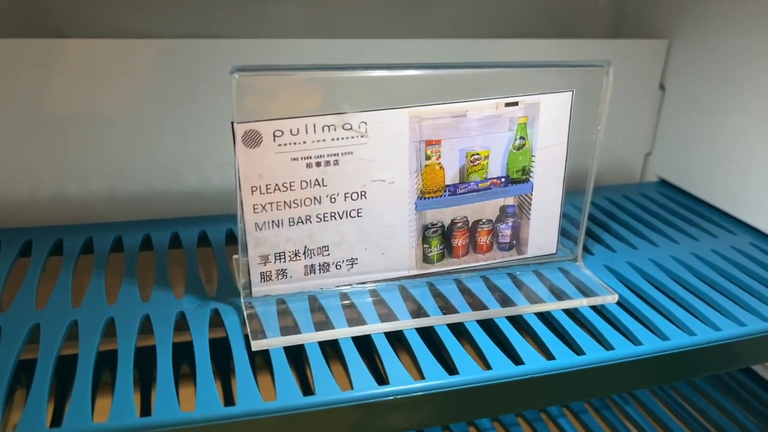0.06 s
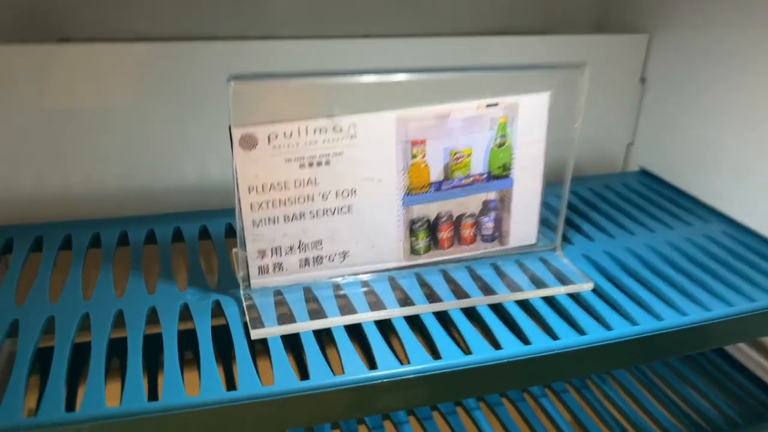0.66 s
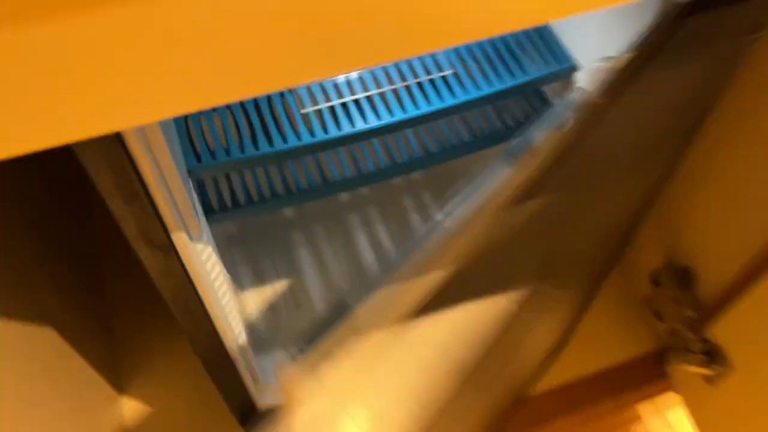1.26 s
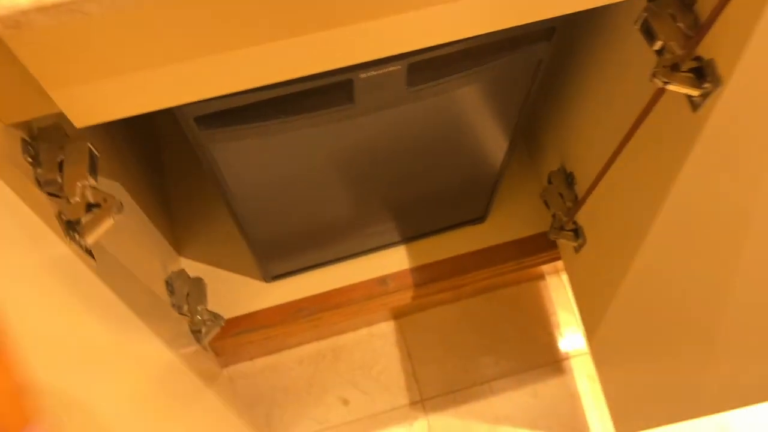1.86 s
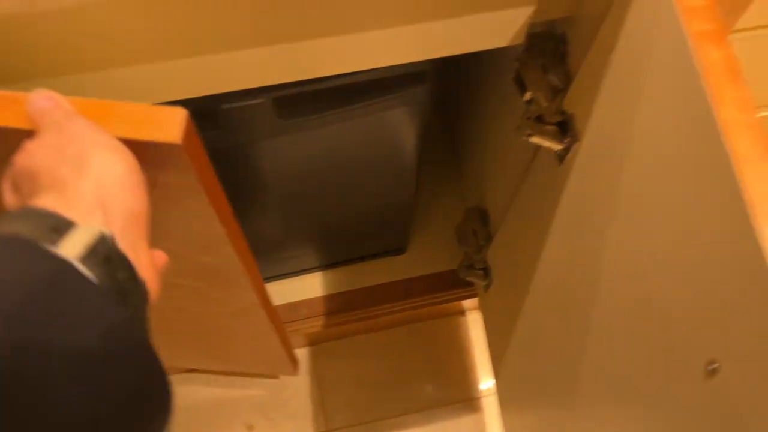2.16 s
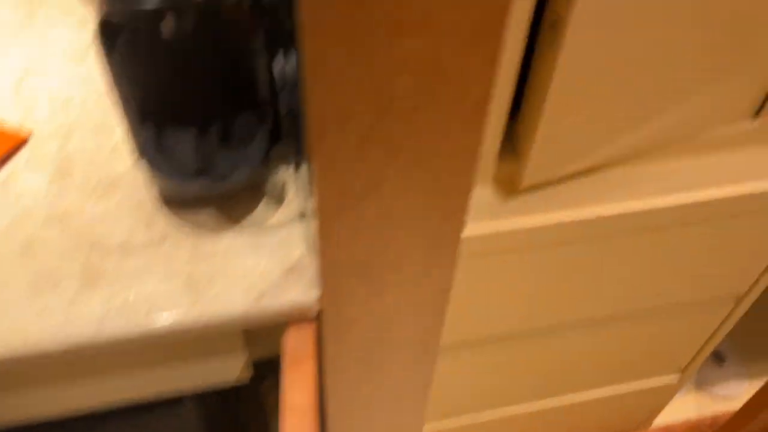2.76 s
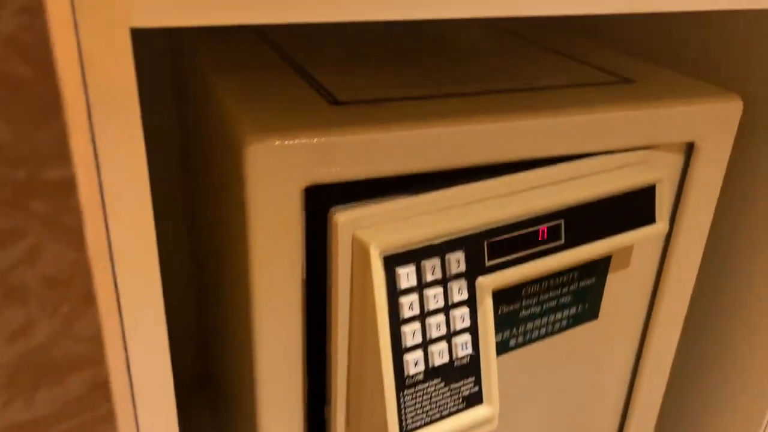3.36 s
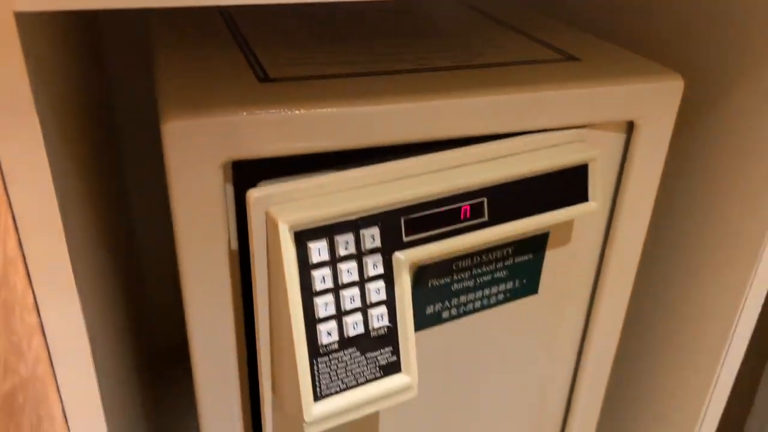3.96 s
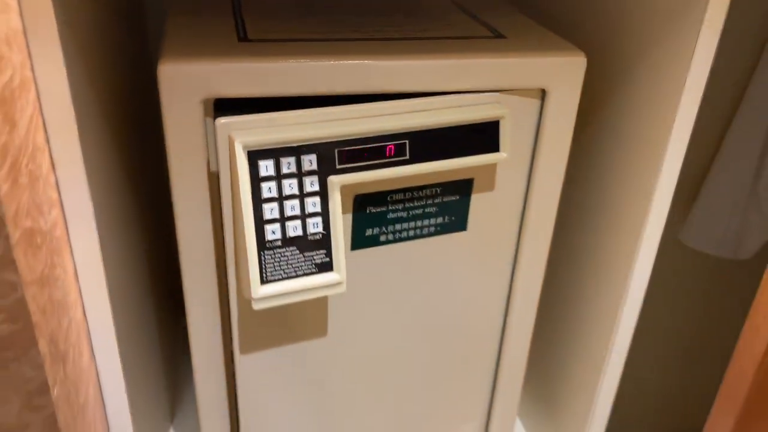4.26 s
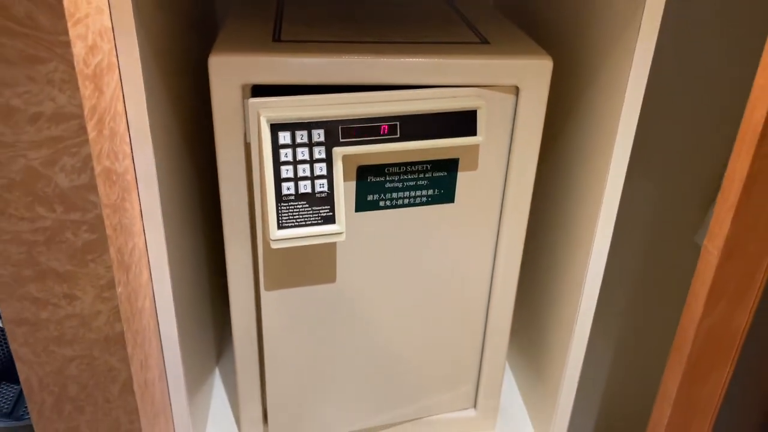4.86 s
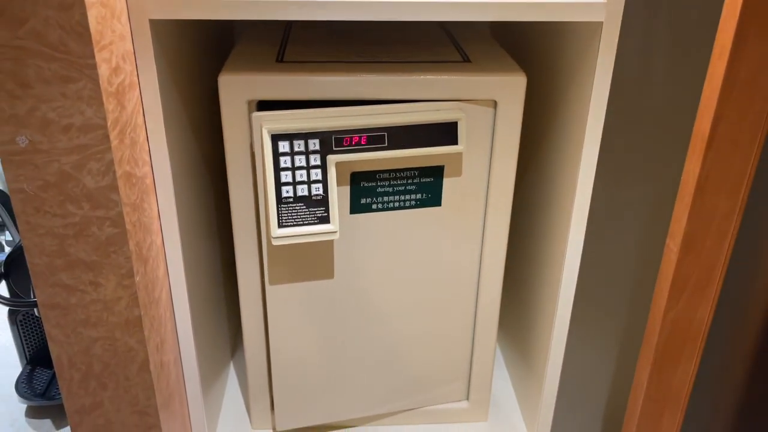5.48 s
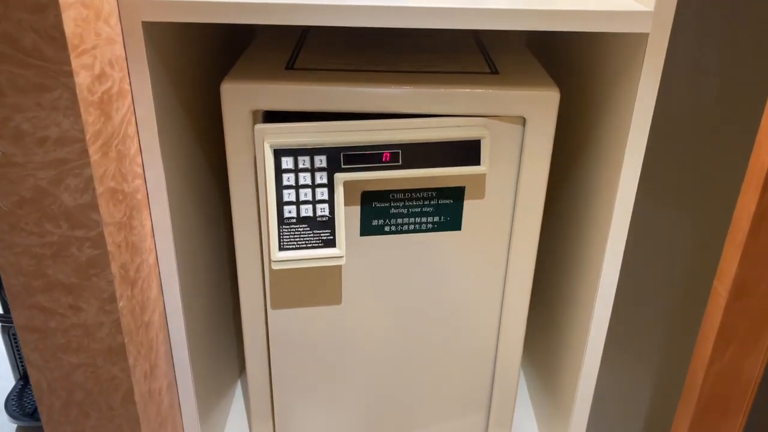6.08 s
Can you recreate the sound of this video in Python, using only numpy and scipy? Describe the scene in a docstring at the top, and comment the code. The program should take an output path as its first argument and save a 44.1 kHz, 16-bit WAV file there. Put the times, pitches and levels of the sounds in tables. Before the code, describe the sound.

Soft hollow bumps and a click come from a small fridge, then its door shuts with a rubbery slap and a low boom. A few light hinge ticks and faint sleeve rustles follow. Then a wooden cabinet door bangs closed, bouncing quickly a few times, with one last click after it. The microphone is close, in a quiet room with a low rush of ventilation.

```python
"""A small fridge is pushed shut, then a wooden cabinet door swings closed, close by in a quiet room.
The fridge's rubber seal slaps against its frame and the whole box booms.
The wooden door bangs and bounces a few times, each blow weaker, and its panel rings.
Around them are soft bumps, hinge ticks, brief rubs, a rustling sleeve and the low rush of ventilation."""
import sys
import numpy as np
from scipy import signal
from scipy.fft import rfft, irfft
from scipy.io import wavfile
from scipy.ndimage import uniform_filter1d

SR = 44100
rng = np.random.default_rng(int(sys.argv[2]) if len(sys.argv) > 2 else 0)


def store_wav(level_fs):
    """Save 16-bit WAV to argv[1]."""
    pcm = np.round(np.clip(np.atleast_2d(level_fs), -1, 1) * 32767)
    wavfile.write(sys.argv[1], SR, pcm.T.astype(np.int16))


N = 274419

# Levels are relative. A "colour" says how strong a noise is at each pitch.
# fade_s is the time to die away by 60 dB. A higher tilt (dB per octave) sounds brighter.
# how alike the left and right sides sound: pitch_hz, likeness (1 = the same)
STEREO_LIKENESS = [(60, 1), (200, 0.84), (450, 0.71), (1000, 0.04), (2000, 0.49), (5000, -0.08),
                   (12000, 0.56)]
# how much louder the left side is: pitch_hz, left_minus_right_db
STEREO_BALANCE = [(60, -1.6), (130, -3), (250, -3.5), (500, -3), (1000, -3), (2000, 0), (4500, 2),
                  (10000, -1)]
# rushing air: pitch_hz, level_db
VENT_COLOUR = [(18, -32.5), (30, -10.5), (58, 0.5), (100, -3.5), (145, -14.5), (190, -9), (300, -11),
               (420, -16), (660, -25), (950, -24.5), (1200, -29.5), (1730, -34.5), (1950, -42.5),
               (2600, -47.5), (4500, -52.5), (8000, -61), (15000, -74.5)]
# the rustle as the arm moves: time_s, level_db
SLEEVE_LEVELS = [(0.0, -78.5), (0.19, -114), (0.5, -85), (0.65, -80), (1.1, -73.5), (1.52, -71),
                 (1.69, -78.5), (1.98, -71.5), (2.11, -72.5), (2.83, -79), (3.21, -81), (3.38, -83.5),
                 (3.66, -83), (3.95, -79), (4.21, -67), (4.35, -91), (4.75, -95), (6.2, -90.5)]
# sliding cloth: pitch_hz, level_db
CLOTH_COLOUR = [(300, 7.5), (900, 7.5), (1800, 0.5), (3000, -2.5), (5000, -2), (7000, -9), (10500, -10),
                (12700, -23.5), (15500, -19.5)]
# scuffs and swishes: start_s, length_s, level_db, pitch_hz, width_octaves
RUB_EVENTS = [(0, 0.13, -52, 710, 0.42), (0.12, 0.033, -59, 3740, 0.42), (1.365, .03, -50.5, 630, 0.27),
              (2.099, 0.041, -59, 1500, 0.99), (2.415, .07, -63.5, 4500, 1), (2.616, 0.077, -63, 1640, 0.4),
              (6.08, 0.088, -61, 1180, 0.57)]
# soft bumps inside the fridge: start_s, level_db
BUMP_EVENTS = [(0.147, -41), (0.308, -43.5), (.604, -44.5), (.621, -37), (.80, -47)]
# the hollow space they ring: pitch_hz, level_db, fade_s
HOLLOW_TONES = [(67, -2, 0.55), (100, 2, 0.6), (116.4, 3.5, 0.36), (159.05, 1.5, 0.74), (234, -5.5, 0.28),
                (278, -8.5, 0.21)]
# hinges, catches and light touches: start_s, level_db, tilt_db_per_octave, pitch_hz
TICK_EVENTS = [(.598, -32.5, -3.5, 1693), (1.132, -34, 4.5, 1810), (1.35, -30, -1, 1050),
               (1.818, -33, -4, 1630), (2.305, -34, -6, 1425), (3.267, -31, -2.5, 1728),
               (3.792, -28, 0, 2307), (4.5404, -28.5, -2, 2660), (4.555, -39, 4, 1660)]
# the click of one tick: pitch_hz, level_db
TICK_COLOUR = [(150, 1), (400, 0.5), (900, 1), (1800, -3.5), (2800, -4.5), (4500, -10.5), (7000, -20),
               (10000, -22), (15500, -29)]
# a small metal part: pitch_multiple, level_db, fade_s
METAL_TONES = [(1, -14.5, 0.13), (1.36, -26, 0.08), (1.78, -21, 0.069)]
# the seal's slap: pitch_hz, level_db
SEAL_COLOUR = [(40, -12), (200, 6), (350, 0), (650, 4), (1000, -6.5), (1900, -10.5), (3000, -18.5),
               (4500, -18), (6500, -24), (10000, -17), (12500, -28.5), (15500, -24.5)]
# how late each pitch comes as the air gap closes: pitch_hz, delay_s
SEAL_DELAYS = [(200, 0.0057), (700, 0.0071), (2000, 0.0032), (5000, .0002)]
# the fridge door bouncing on trapped air and rubber: pitch_hz, level_db, fade_s
CUSHION_TONES = [(97, -6, 0.061), (188.8, -9.5, .04)]
# the fridge box, its shelves and the cupboard round it: pitch_hz, level_db, fade_s
FRIDGE_TONES = [(56.92, -7, 0.74), (53.55, -29.5, 2.1), (98, -16.5, 0.27), (128, -23, 0.55),
                (160.2, -21.5, 0.5), (184, -19.5, 0.18), (250.3, -25, 0.46), (296, -25, 0.35),
                (359, -29, .17), (534, -25.5, .15), (580, -28.5, .3), (662, -29.5, 0.25),
                (957, -23.5, 0.21), (1170, -32.5, .22), (1510, -34.5, 0.37), (1870, -32, .11),
                (2210, -33, .12)]
# the fridge's boom in the room: pitch_hz, level_db
BOOM_COLOUR = [(20, -21), (45, -1.5), (100, -3), (190, 2), (300, -2.5), (420, -6.5), (560, -6.5),
               (820, -11.5), (1500, -16), (2500, -19), (3600, -22.5), (4700, -24.5), (6300, -31.5),
               (10000, -30), (12500, -47.5), (15500, -37.5)]
# how long that boom lasts: pitch_hz, fade_s
BOOM_FADES = [(60, 1), (250, .5), (800, 0.52), (2000, .36), (5000, 0.37), (12000, 0.36)]
# the slap coming back from the walls: pitch_hz, level_db
ECHO_COLOUR = [(60, -15), (200, -18), (600, 10.5), (1000, -8), (2300, -6), (4500, -13), (9000, -24),
               (15000, -36)]
# wood hitting wood: pitch_hz, level_db
CLACK_COLOUR = [(100, -11), (250, -9.5), (450, 4.5), (700, -4), (1000, 8), (1300, 5.5), (1650, 7.5),
                (1850, -6), (2400, 1.5), (3200, -13), (4200, -12.5), (5500, -38.5), (8000, -26.5),
                (11000, -39.5), (15500, -44)]
# the wooden panel and its cabinet: pitch_hz, level_db, fade_s
PANEL_TONES = [(63.7, -37, 1), (81.3, -29.5, 0.49), (98.6, -25.5, 0.53), (177.8, -29.5, .5),
               (212.2, -25.5, 0.63), (266, -27.5, .5), (339.5, -15.5, .4), (361.6, -21, 0.3),
               (407, -29.5, 0.3), (481, -29.5, 0.52), (504, -20.5, 0.36), (550, -24.5, 0.43),
               (731, -36, 0.31), (815, -32.5, .45), (904, -30.5, .42), (946, -26.5, 0.55),
               (1000, -19.5, 0.26), (1264, -28.5, 0.38), (1269, -30, 0.22), (1387, -31.5, 0.32),
               (1437, -30.5, 0.24), (1662, -25.5, 0.29), (1860, -34.5, 0.16), (2210, -38, 0.42),
               (2406, -35, 0.28), (2528, -43, .38)]
# the wooden door's sound in the room: pitch_hz, level_db
DOOR_ROOM_COLOUR = [(20, -24), (45, -2.5), (90, -3), (140, -8.5), (210, -1.5), (350, 5), (420, -3.5),
                    (680, -3), (1000, -3.5), (1600, -5), (1850, -10.5), (2500, -13), (3100, -21),
                    (4200, -25), (6000, -36), (9000, -38), (12500, -53), (15500, -50.5)]
# how long the room holds a tick or a clack: pitch_hz, fade_s
ROOM_FADES = [(60, 0.9), (200, .6), (500, 0.36), (1500, 0.39), (4000, 0.45), (8000, 0.39), (14000, .35)]
# the hollow cabinet's thud: pitch_hz, level_db, fade_s
THUD_TONES = [(201.5, -16.5, 0.27), (208.4, -11, 0.25)]
# how fast the short sounds die: pitch_hz, fade_s
TICK_FADES = [(300, .14), (8000, .11)]
SEAL_FADES = [(200, .092), (1000, .06), (8000, .055)]
ECHO_FADES = [(200, .22), (8000, .062)]
CLACK_FADES = [(300, .09), (1500, .055), (8000, .062)]
# the wooden door's bass comes last: pitch_hz, delay_s
DOOR_DELAYS = [(150, .012), (400, .0093), (1000, .002), (4000, .0003)]

FRIDGE_SHUT_S, DOOR_HIT_S, DOOR_HOME_S = 1.4903, 4.1165, 4.213
SPRING_LEAD_S = .037  # the hinge spring snaps this long before the wooden door hits


def amp(db):
    """Turns decibels into a number to multiply a sound by."""
    return 10 ** (np.asarray(db) / 20)


def look_up(table, hz):
    """A table's value at any pitch, sliding smoothly between its rows."""
    pitches, values = np.transpose(table)
    return np.interp(np.log(hz + 1), np.log(pitches + 1), values)


def unit_power(sound):
    """Scales a sound so its average power is 1."""
    return sound / np.sqrt(np.mean(sound ** 2) + 1e-20)


def add(mix, start_s, sound):
    """Lays a stereo sound into the mix."""
    part = mix[:, max(round(start_s * SR), 0):][:, :sound.shape[1]]
    part += sound[:, :part.shape[1]]


def side_gains(hz):
    """How strong a pitch is on the left and on the right."""
    return amp(np.array([[.5], [-.5]]) * look_up(STEREO_BALANCE, hz))


def stereo_noise(size, right_delay_ms=0):
    """Pitches and spectrum of a noise whose two sides match in the bass and part in the treble."""
    hz = np.fft.rfftfreq(size, 1 / SR)
    left, other = rfft(rng.standard_normal((2, size)))
    likeness = np.clip(look_up(STEREO_LIKENESS, hz), -1, 1)
    right = likeness * left + np.sqrt(1 - likeness ** 2) * other
    delay = np.exp(-2j * np.pi * hz * right_delay_ms / 1000)
    return hz, np.array([left, right * delay]) * side_gains(hz)


def resonances(depth_db, count=260):
    """Random peaks and dips from an object's many small resonances. Rows: pitch_hz, level_db."""
    hz = np.linspace(20, 130, count) ** 2
    db = depth_db * np.clip(rng.standard_normal(count), -2, 2) * np.minimum(hz / 1500, 1)
    return np.c_[hz, db - np.log(10) / 20 * np.mean(db ** 2)]  # keeps the power about the same


def burst(colour, body, fades, rise_s, tilt=0, delays=((1, 0),), right_delay_ms=0, size=32768):
    """The noise of a hit: each band of pitches starts, swells and dies away on its own timing."""
    hz, noise = stereo_noise(size, right_delay_ms)
    octaves = np.clip(np.log2((hz + 1) / 1000), -3, 3)
    spectrum = noise * amp(look_up(colour, hz) + look_up(body, hz) + tilt * octaves)
    centres = np.geomspace(40, 16000, 16)
    out = np.zeros((2, size))
    for centre, share in zip(centres, np.eye(len(centres))):
        age = np.maximum(np.arange(size) / SR - look_up(delays, centre), 0)
        band = irfft(spectrum * look_up(np.c_[centres, share], hz), size)
        swell = 1 - np.exp(-(age / rise_s) ** 2)
        out += band * swell * np.exp(-np.log(1000) * age / look_up(fades, centre))
    return out


def ring(tones, rise_s, right_delay_ms=0, blows=((0, 0, 0),)):
    """The fading tones of a struck object; each blow tops up their swing."""
    hz, db, fade_s = np.transpose(tones)[:, :, None]
    t = np.arange(3 * SR // 2) / SR
    swing = 0
    for start_s, blow_db, tilt in blows:
        age = np.maximum(t - start_s, 0)
        force = amp(blow_db + tilt * np.log2(hz / 1000))
        swing = swing + force * (1 - np.exp(-age / rise_s)) * np.exp(-np.log(1000) * age / fade_s)
    waves = amp(db) * swing * np.exp(2j * np.pi * hz * t)
    delay = np.exp(-2j * np.pi * np.outer([0, right_delay_ms / 1000], hz))
    return ((side_gains(hz[:, 0]) * delay) @ waves).imag


def swish(length_s, db, pitch_hz, width_octaves):
    """A band of noise, like rubbing or moving air, that swells, holds and quickly fades."""
    t = np.arange(SR // 2) / SR
    hz, noise = stereo_noise(len(t))
    band = np.exp(-.5 * (np.log2((hz + 1) / pitch_hz) / width_octaves) ** 2)
    colour = band * amp(look_up(resonances(depth_db=4.5), hz))
    swell = 1 - np.exp(-t / (.34 * length_s))
    fade = np.exp(-np.maximum(t - length_s, 0) / (.14 * length_s))
    return amp(db) * unit_power(irfft(noise * colour, len(t))) * swell * fade


def ventilation(hum_hz=99.2):
    """Moving air makes a steady low rush, with a faint hum under it."""
    t = np.arange(N) / SR
    hz, noise = stereo_noise(N)
    colour = amp(look_up(VENT_COLOUR, hz) + look_up(resonances(depth_db=3.5), hz))
    rush = unit_power(irfft(noise * colour, N))
    hum = np.sqrt(2) * np.sin(2 * np.pi * hum_hz * t) * side_gains(hum_hz)
    return amp(-50.5) * rush + amp(-57.5) * hum


def sleeve_rustle():
    """Cloth hisses as the arm moves, and its folds make the level flutter."""
    hz, noise = stereo_noise(N)
    cloth = unit_power(irfft(noise * amp(look_up(CLOTH_COLOUR, hz)), N))
    folds_db = .74 * unit_power(uniform_filter1d(rng.standard_normal(N), size=700))
    movement_db = np.interp(np.arange(N) / SR, *np.transpose(SLEEVE_LEVELS))
    return cloth * amp(14 + movement_db + folds_db)


def rubs():
    """Surfaces brush past each other: a swish with a weaker, higher one on top."""
    out = np.zeros((2, N))
    for start_s, length_s, db, hz, width in RUB_EVENTS:
        add(out, start_s, swish(length_s, db, hz, width))
        add(out, start_s, swish(length_s, db - 8.5, hz * 2.34, width))
    return out


def bumps():
    """Soft bumps ring the hollow inside of the fridge."""
    out = np.zeros((2, N))
    hollow = ring(HOLLOW_TONES, rise_s=.0023)
    for start_s, db in BUMP_EVENTS:
        add(out, start_s, amp(db) * hollow)
    return out


def ticks():
    """A square knock is dull, sudden and rings the metal; a glancing one is bright and rings less."""
    out = np.zeros((2, N))
    for start_s, db, tilt, pitch_hz in TICK_EVENTS:
        body = resonances(depth_db=3.5)
        rise_s = .0025 * 2 ** (tilt / 2.2)  # brighter knocks start more slowly
        click = burst(TICK_COLOUR, body, TICK_FADES, rise_s, tilt=tilt, size=8192)
        metal = ring(np.array(METAL_TONES) * [pitch_hz, 1, 1], rise_s)
        room = burst(TICK_COLOUR, body, ROOM_FADES, rise_s=.0065, tilt=tilt, size=16384)
        add(out, start_s, amp(db - 5.5) * click)
        add(out, start_s, amp(db - 11.5 - 1.15 * tilt) * metal)
        add(out, start_s, amp(db - 15.5) * room)
    return out


def add_air_puff(mix, hit_s, db):
    """A closing door pushes air ahead of it, starting just before it hits."""
    add(mix, hit_s - .026, swish(length_s=.084, db=db, pitch_hz=170, width_octaves=.8))


def fridge_door():
    """The seal slaps, the door bounces on trapped air, the box booms and the walls echo the slap."""
    out = np.zeros((2, N))
    body = resonances(depth_db=3.5)
    add_air_puff(out, FRIDGE_SHUT_S, db=-37.5)
    slap = burst(SEAL_COLOUR, body, SEAL_FADES, rise_s=.0022, delays=SEAL_DELAYS, right_delay_ms=.026)
    boom = burst(BOOM_COLOUR, body, BOOM_FADES, rise_s=.0097, delays=SEAL_DELAYS)
    echo = burst(ECHO_COLOUR, body, ECHO_FADES, rise_s=.0087)
    add(out, FRIDGE_SHUT_S, amp(8) * slap)
    add(out, FRIDGE_SHUT_S + .004, amp(-2) * boom)
    add(out, FRIDGE_SHUT_S + .0085, -ring(CUSHION_TONES, rise_s=.0008))
    add(out, FRIDGE_SHUT_S + .0125, ring(FRIDGE_TONES, rise_s=.005))
    add(out, FRIDGE_SHUT_S + .058, amp(-13.5) * echo)
    return out


def door_blows(first_flight_s=.081, rebound=.7):
    """The spring snaps, then the door bounces like a ball. Rows: start_s, level_db, tilt_db_per_octave."""
    blows = [(DOOR_HIT_S - SPRING_LEAD_S, -30, 0)]
    start_s = DOOR_HIT_S
    for bounce in range(5):
        flight_s = first_flight_s * rebound ** bounce
        db, tilt = -6.5 * bounce, -1.12 * bounce  # weaker and duller each time
        blows.append((start_s, db, tilt))
        # the panel twists, so its far corner lands a little later
        blows.append((start_s + .38 * flight_s, db - 12, tilt))
        start_s += flight_s
    return blows


def cabinet_door():
    """Each blow clacks, rings the panel and fills the room; the cabinet thuds as the door presses home."""
    out = np.zeros((2, N))
    body = resonances(depth_db=3)
    blows = door_blows()
    for start_s, db, tilt in blows:
        clack = burst(CLACK_COLOUR, body, CLACK_FADES, rise_s=.0026, tilt=tilt,
                      delays=DOOR_DELAYS, right_delay_ms=.17, size=8192)
        room = burst(DOOR_ROOM_COLOUR, body, ROOM_FADES, rise_s=.011, tilt=tilt,
                     delays=DOOR_DELAYS, right_delay_ms=.05)
        add(out, start_s, amp(4.5 + db) * clack)
        add(out, start_s + .003, amp(2 + 1.11 * db) * room)
    add_air_puff(out, DOOR_HIT_S, db=-29)
    snap_s = blows[0][0]
    spring_scrape = swish(SPRING_LEAD_S, db=-41.5, pitch_hz=1500, width_octaves=.73)
    add(out, snap_s, spring_scrape)
    # light blows are mostly clack: the ring drops 2.5 dB for each dB the blow drops
    pushes = [(start_s - snap_s, 2.5 + 2.5 * db, tilt) for start_s, db, tilt in blows]
    panel = ring(PANEL_TONES, rise_s=.0033, right_delay_ms=.16, blows=pushes)
    # loose hinges chatter and roughen the ring
    chatter_db = 2.1 * unit_power(uniform_filter1d(rng.standard_normal(panel.shape[1]), size=300))
    add(out, snap_s + .004, panel * amp(chatter_db))
    add(out, DOOR_HOME_S, ring(THUD_TONES, rise_s=.012))
    return out


def scene():
    """Both doors and the small sounds of the quiet room."""
    return fridge_door() + cabinet_door() + ticks() + bumps() + rubs() + ventilation() + sleeve_rustle()


def record(dry):
    """Rounds off the loudest peaks, then cuts the very highest treble."""
    ceiling, cutoff_hz = .95, 15900
    rounded = dry / (1 + (dry / ceiling) ** 6) ** (1 / 6)
    low_pass = signal.firwin(511, cutoff_hz, window=("kaiser", 9), fs=SR)
    return signal.oaconvolve(rounded, low_pass[None], "same")


dry = scene()
out = record(dry)
store_wav(out)
```